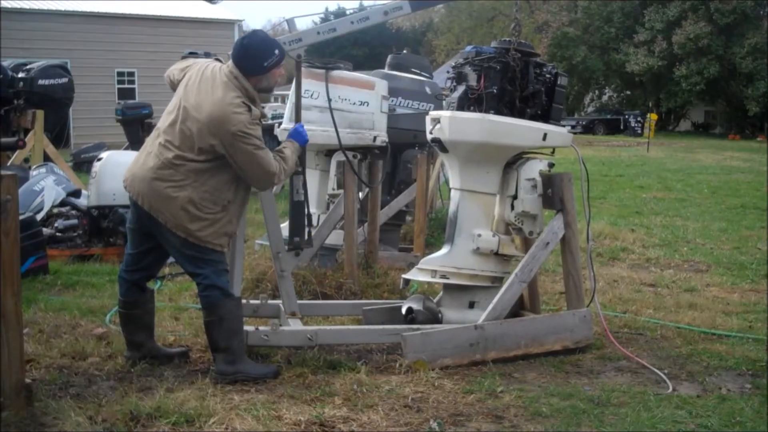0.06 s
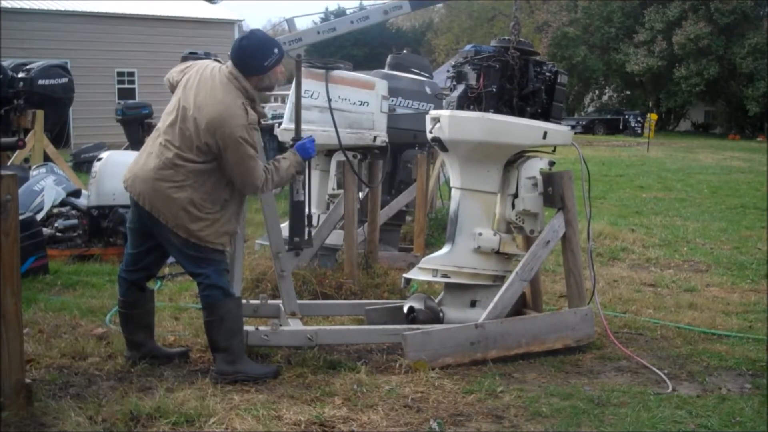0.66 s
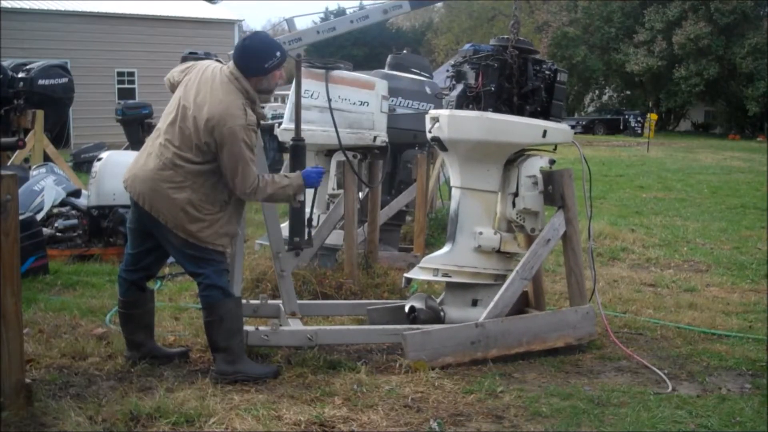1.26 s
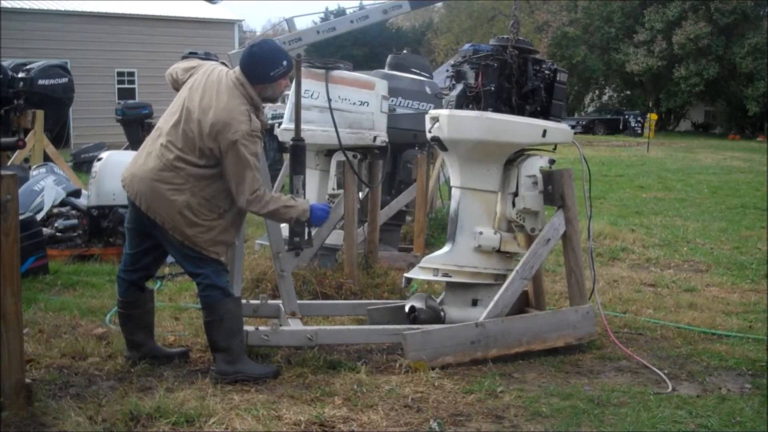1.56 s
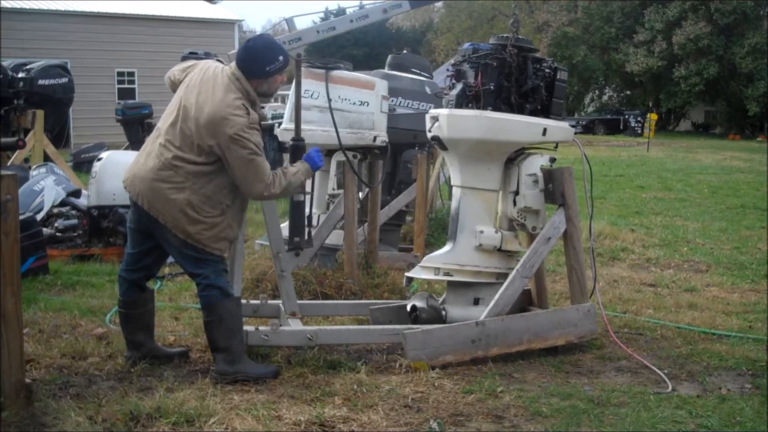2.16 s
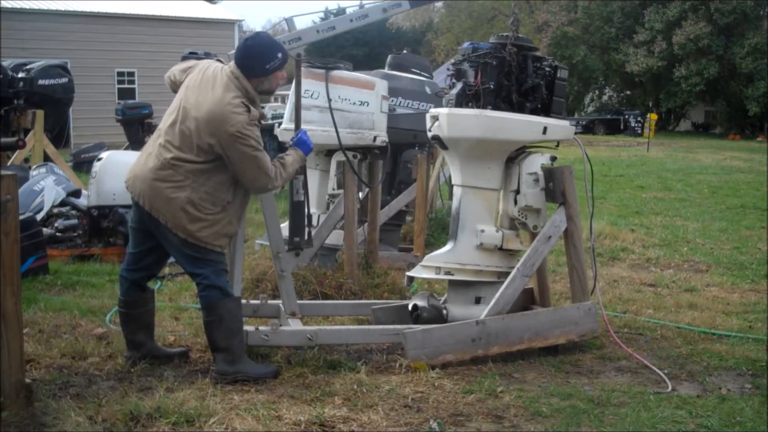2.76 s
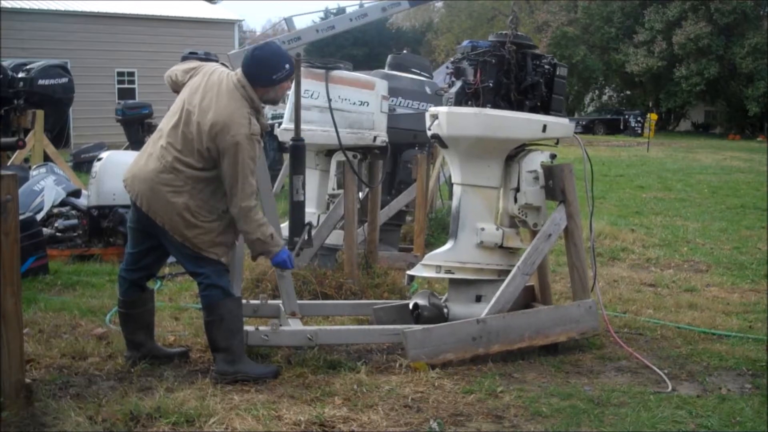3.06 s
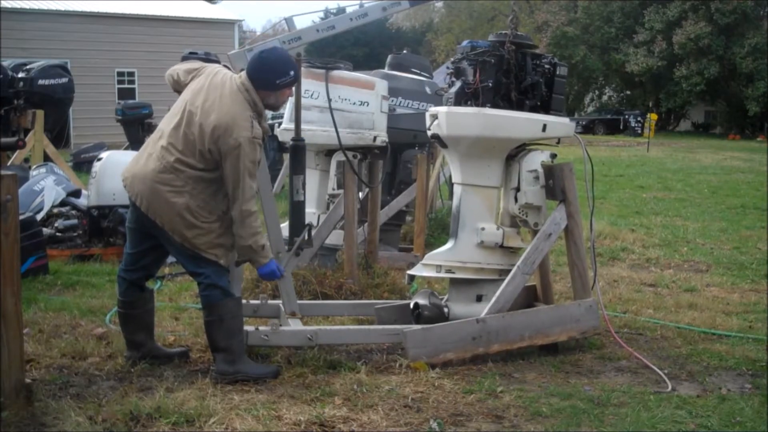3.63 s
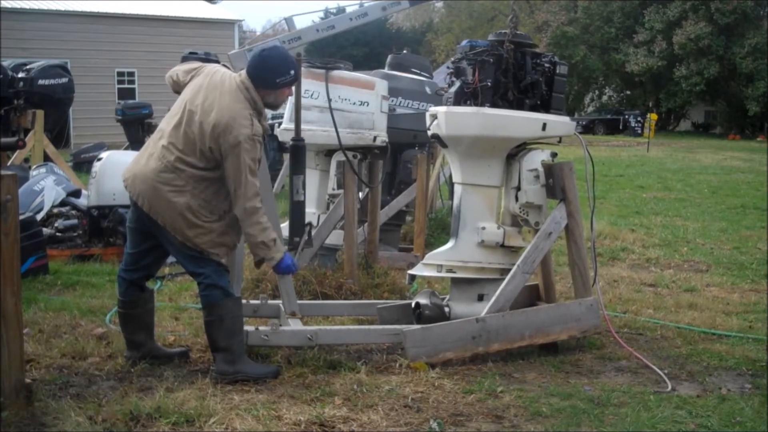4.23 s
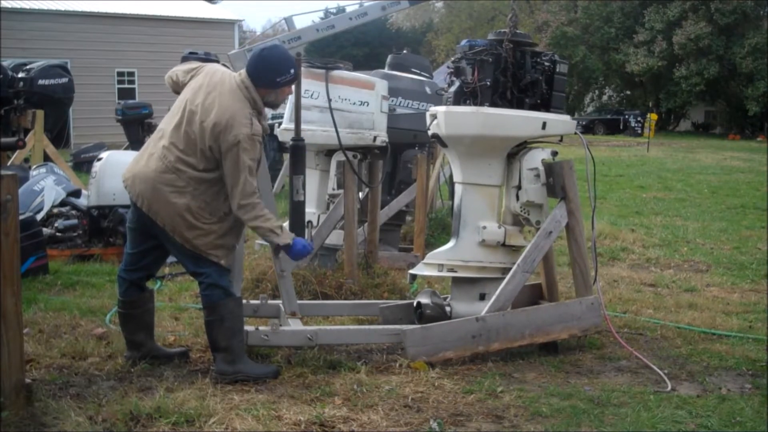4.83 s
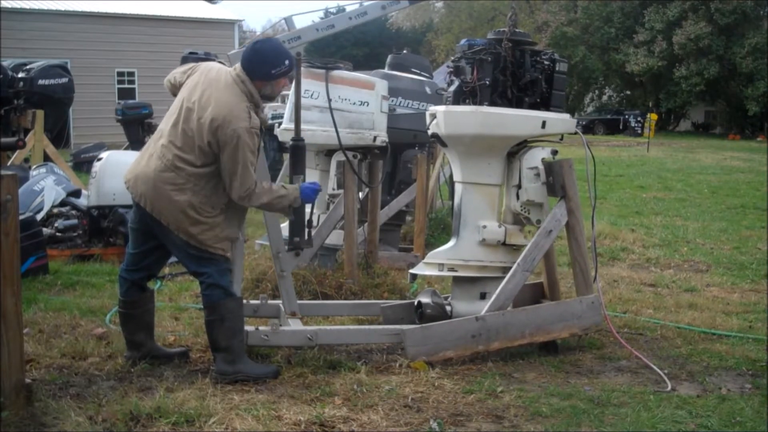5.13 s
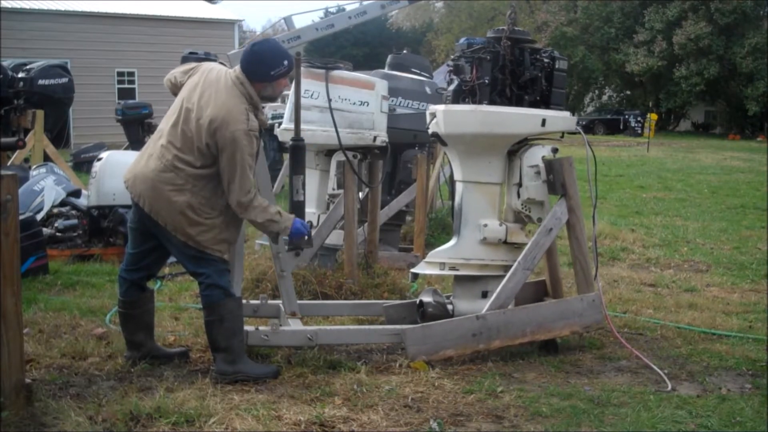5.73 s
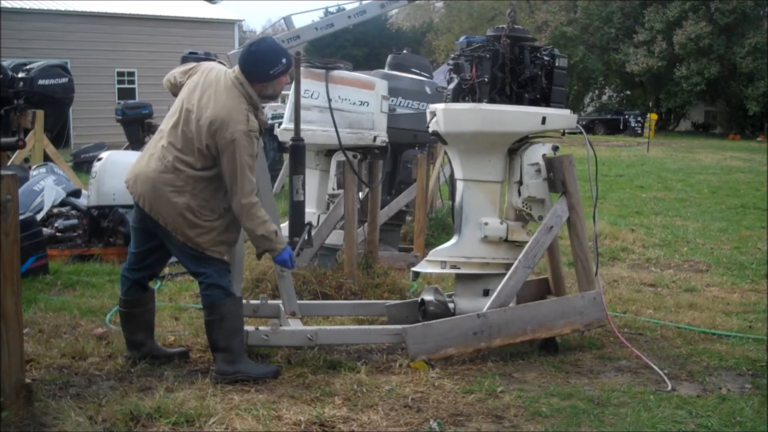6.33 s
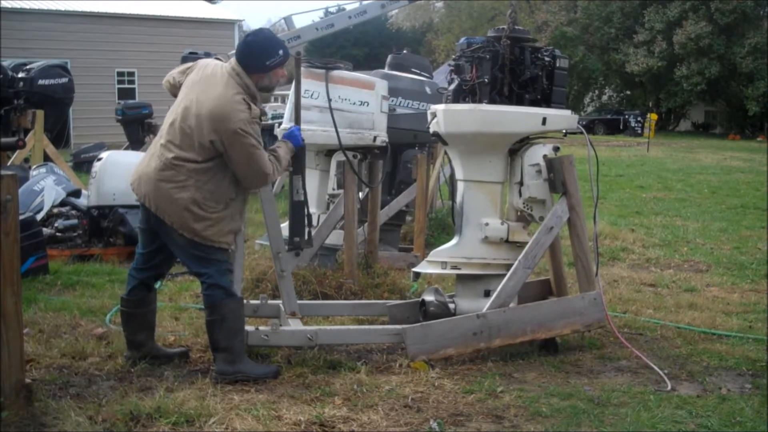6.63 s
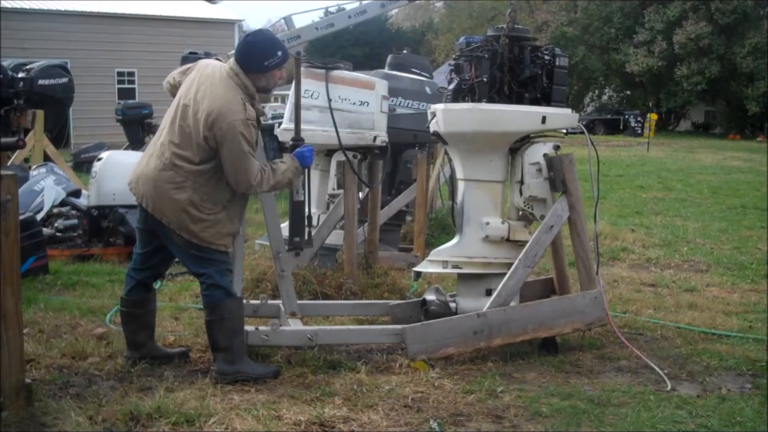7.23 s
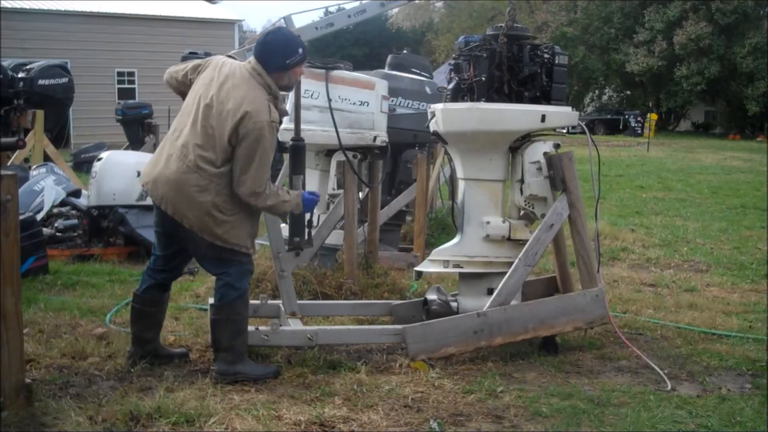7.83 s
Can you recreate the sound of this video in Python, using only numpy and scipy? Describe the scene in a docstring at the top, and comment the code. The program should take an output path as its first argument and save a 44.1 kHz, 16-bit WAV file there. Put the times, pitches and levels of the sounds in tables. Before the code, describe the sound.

A hand-pumped lever hoist clacks steadily outdoors, with lighter return knocks, chain ticks, tiny squeaks and ringing steel.

```python
"""A hook pings as its chain snaps taut; then a hand-pumped lever hoist clacks, lifting an outboard motor.
Each stroke: the pawl snaps over, the lever takes the load, the brake slips with a short squeak.
The lever knocks on its return; links tick, slack chain knocks and brushes, dry joints creak.
The blows ring the steel engine crane. Behind: an open yard, a thin echo, a faint distant hum."""
import sys
import numpy as np
from scipy import signal
from scipy.fft import rfft, irfft
from scipy.io import wavfile
from scipy.ndimage import uniform_filter1d

SR = 44100
rng = np.random.default_rng(int(sys.argv[2]) if len(sys.argv) > 2 else 0)


def materialize(psi):
    """Save the field psi as 16-bit PCM at rate SR to the path in sys.argv[1].

    A 1-D psi becomes a single channel; in a 2-D psi each row is a channel.
    """
    bounded = np.clip(np.atleast_2d(psi).T, -1, 1)
    quanta = np.round(bounded * 32767).astype(np.int16)
    wavfile.write(sys.argv[1], SR, quanta)


N = 356328
HZ = np.maximum(np.fft.rfftfreq(N, 1 / SR), 1)
TIME_S = np.arange(N) / SR
AGE_S = TIME_S[:SR // 2]  # time within one event

# Event levels are relative; each layer adds its own offset.
# power strokes: (clack time [s], clack [dB], frame [dB], pawl lead [s], pawl [dB],
#                 squeak [dB], squeak hold [s], squeak pitch [Hz])
POWER_STROKES = [(0.2507, -3, -23.5, .0324, -3, -17, 0.011, 7470),
                 (0.9336, -2, -22.5, .0286, -11.5, -24, 0.024, 7530),
                 (1.5912, -1.5, -22.5, 0.028, -9.5, -19, 0.016, 7590),
                 (2.2549, -0.5, -21, 0.038, -23, -36, .01, 7800),
                 (2.9056, -4, -21, 0.032, -4.5, -21.5, 0.015, 7700),
                 (3.5502, -1.5, -19.5, 0.026, -9.5, -44, .01, 7550),
                 (4.182, -2, -21.5, 0.028, -11.5, -15.5, 0.051, 7460),
                 (4.8165, -2.5, -22, 0.027, -9, -19.5, 0.043, 7470),
                 (5.4809, -4, -21.5, .024, -4, -15, 0.036, 7460),
                 (6.1465, -2.5, -22, 0.032, -8.5, -14, 0.015, 7430),
                 (6.8227, -3, -24, 0.03, -9, -17.5, 0.027, 7280),
                 (7.513, -4, -22.5, 0.03, -6, -14, .032, 7490)]
# lever hitting its return stop: (time [s], knock [dB], frame [dB], pawl lead [s], pawl [dB])
RETURN_SWINGS = [(.62, -11, -28.5, 0.034, -13.5), (1.275, -10, -27.5, .0236, -16),
                 (1.934, -9, -26.5, .053, -7), (2.58, -10.5, -27, 0.024, -16.5),
                 (3.241, -7.5, -29.5, 0.021, -16), (3.8821, -8, -26.5, .0196, -9),
                 (4.5131, -8.5, -30.5, 0.026, -20), (5.1642, -10, -28, 0.024, -12.5),
                 (5.8331, -12.5, -30.5, .0228, -8.5), (6.4813, -9.5, -34, 0.01, -9),
                 (7.175, -13.5, -29.5, 0.046, -34), (7.877, -7.5, -31.5, .0249, -19)]
# swinging chain hitting the crane, and a few dull link knocks: (time [s], snap [dB], frame [dB], snap t60 [s])
CHAIN_KNOCKS = [(0.1121, -12.5, -22, 0.2), (0.626, -29, -24, 0.14), (.7928, -23, -27.5, 0.14),
                (1.1348, -33, -38.5, .07), (1.306, -34, -28.5, .07), (1.4642, -34, -24.5, 0.24),
                (1.7128, -30, -30.5, .06), (2.125, -28, -31.5, .06), (2.7224, -20.5, -30.5, 0.21),
                (2.7869, -31, -31, 0.054), (3.4882, -42, -35, .06), (4.7115, -33, -34.5, 0.064),
                (5.3056, -32, -40.5, 0.064), (6.5065, -11.5, -27.5, .062), (6.708, -28, -31.5, 0.047),
                (6.8838, -4, -19, .14), (7.8994, -13.5, -26.5, 0.17)]
# links seating: (time [s], snap [dB])
LINK_TICKS = [(.39, -22), (0.4662, -17), (1.3692, -10), (1.4176, -21.5), (1.7906, -32), (1.911, -8),
              (2.0747, -30), (2.1473, -23), (2.4379, -20.5), (2.4912, -9.5), (3.1109, -19.5),
              (3.373, -23.5), (3.4313, -16.5), (3.674, -17), (3.7528, -12.5), (4.022, -16), (4.04, -13.5),
              (4.074, -28), (4.3874, -6), (4.649, -20.5), (4.9422, -23), (4.984, -27), (5.029, -6.5),
              (5.3812, -15.5), (5.677, -26), (5.6992, -5.5), (5.7901, -13), (5.9703, -26.5),
              (6.0342, -23.5), (6.2879, -26), (6.3697, -7), (6.6813, -25), (7.006, -25), (7.034, -8.5),
              (7.749, -9.5)]
# chain snapping taut at the hook: (time [s], ping [dB], frame [dB])
HOOK_PINGS = [(.089, -7, -25.5), (0.7514, -24.5, -37), (.763, -5, -28.5)]
# dry joints under load: (time [s], level [dB], length [s], start pitch [Hz], end pitch [Hz])
JOINT_CREAKS = [(2.437, -30, 0.047, 2780, 2720), (2.727, -37.5, 0.071, 662, 654),
                (3.823, -34, 0.045, 1900, 2000), (5.728, -40, 0.055, 3250, 3180),
                (5.758, -37, 0.033, 2930, 2500), (5.877, -34, 0.018, 980, 774),
                (5.878, -33, 0.028, 572, 503), (5.912, -40, 0.034, 650, 690),
                (7.833, -31, 0.058, 1840, 1900)]

# steel resonances: (frequency [Hz], width [Hz], peak over contact spectrum [dB])
LEVER_RESONANCES = [(2733, 21, 16.3), (4070, 29, 12), (6110, 115, 7.5), (6490, 67, 9.9), (7910, 144, 13.8),
                    (8600, 34, 3.6), (9710, 130, 13.5), (11510, 110, 12.7)]
PAWL_RESONANCES = [(1880, 180, 27), (2796, 39, 32.5), (3918, 69, 29.5), (5120, 106, 25.5), (6470, 23, 27.5),
                   (7974, 54, 31), (9430, 23, 17)]
LINK_RESONANCES = [(2100, 110, 6.1), (2730, 43, 14.3), (4030, 150, 11.5), (5380, 310, 8.2),
                   (6520, 930, 5.1), (8040, 310, 10.7), (9970, 340, 14)]
HOOK_RESONANCES = [(2500, 38, 3), (3560, 190, 7.6), (4430, 54, 4.9), (6120, 110, 18), (7320, 310, 12),
                   (9000, 170, 3)]
FRAME_RESONANCES = [(395.2, 5.5, 14.8), (676.6, 28, 6.8), (825, 74, 4.6), (979, 30, 11.24), (1363, 8.9, 9),
                    (1490, 11.4, 7.8), (1689, 24, 7.7), (1830, 13, 7.2), (2240, 15, 7.6), (2356, 38, 3.7),
                    (2506, 9.2, 8.5), (2692, 22, 1.25), (2776, 13, 8.7), (3390, 14, 7.6), (4170, 30, 9.5),
                    (4330, 11, 2.7), (4610, 28, 8.2), (5300, 7.1, 7.2), (6350, 30, 3.9), (6200, 34, 14.6)]
# spectral shapes of contacts and outdoor air: (frequency [Hz], relative level [dB])
SNAP_SPECTRUM = [(200, -40), (800, -34), (2000, -15), (4000, -5.5), (6500, 2), (8300, -4.5), (10500, -22.5),
                 (13500, -17.5), (15000, -58)]
TICK_SPECTRUM = [(200, -32), (800, -11.5), (2000, -4), (4000, -2.5), (6500, 7), (8300, -3), (10500, -22.5),
                 (13500, -21.5), (15000, -37)]
FRAME_SPECTRUM = [(100, -18.5), (300, -15.5), (530, -16), (720, -3), (1200, -3.5), (2200, 2.5),
                  (3400, -3.5), (5500, -7.5), (8000, -17.5), (10500, -36), (13500, -60), (15000, -18.5)]
AIR_SPECTRUM = [(15, -58), (25, -23.5), (98, -7.5), (263, -16.5), (393, -7), (542, -13.5), (977, -2),
                (1210, -5.5), (1710, -4), (3090, -17.5), (6190, -20), (8090, -22.5), (10600, -33.5),
                (13500, -34), (15000, -48)]
# distant machine: (frequency [Hz], level [dB])
HUM_TONES = [(98.5, -64), (143, -67.5), (205, -69.5)]
# stereo colour: (frequency [Hz], left minus right [dB], left phase lead [rad])
STEREO_COLOUR = [(100, -1, -0.11), (2370, -1.5, -0.27), (4200, -2.5, -0.69), (5740, -4, -1.03),
                 (6590, -14.5, 1.4), (6640, 3, 1.55), (7820, 12.5, 1.09), (9970, 5.5, -1.7),
                 (12000, 6.5, -1.4)]


def lever_clacks():
    """The loaded lever strikes hard; its push on the frame swells later. Returns (sound, push)."""
    times_s, db, frame_db = np.transpose(POWER_STROKES)[:3]
    snap = contacts(times_s, db - 8, t60_s=.093, rise_s=.00072, spread=.093, grain_db=-2.5)
    push = contacts(times_s, frame_db + 8.5, t60_s=.17, rise_s=.013, spread=.1, grain_db=-1)
    tones = ring(times_s, db - 11, LEVER_RESONANCES, scatter_db=15) + frame_ring(times_s, frame_db - 5)
    return filtered(snap, response(SNAP_SPECTRUM, LEVER_RESONANCES)) + tones, push


def pawl_snaps(power_push_db=-38.5, return_push_db=-33.5):
    """The light pawl snaps over and buzzes just before the lever lands. Returns (sound, push)."""
    lands_s, _, _, lead_s, db = np.transpose([row[:5] for row in POWER_STROKES + RETURN_SWINGS])
    times_s = lands_s - lead_s
    push_db = np.repeat([power_push_db, return_push_db], [len(POWER_STROKES), len(RETURN_SWINGS)])
    snap = contacts(times_s, db - 8.5, t60_s=.022, rise_s=.00023, spread=.3, grain_db=-3)
    buzz = contacts(times_s, db - 21.5, t60_s=.17, rise_s=.0044, spread=.21, grain_db=2)
    push = contacts(times_s, push_db, t60_s=.33, rise_s=.00077, spread=.05, grain_db=4)
    tones = ring(times_s, db - 12.5, PAWL_RESONANCES, scatter_db=6.5)
    return filtered(snap + buzz, response(SNAP_SPECTRUM, PAWL_RESONANCES)) + tones, push


def brake_squeaks(delay_s=.016, drop_hz=200, flutter_db=5.5, beat_hz=390, lower_db=-5.5):
    """The brake slips after each clack: a whistle sinks to pitch, beating with a shorter, lower one."""
    out, size = np.zeros(N), len(AGE_S)
    for clack_s, *_, db, hold_s, hz in POWER_STROKES:
        pitch_hz = hz + np.exp(-AGE_S / .012) * drop_hz * (1 + wander(600, size))
        phase = 2 * np.pi * np.cumsum(pitch_hz) / SR
        whistle = undb(flutter_db * wander(330, size)) * np.sin(phase)
        lower_gain = undb(lower_db + flutter_db * wander(210, size)) * decay(AGE_S, t60_s=.41)
        lower = lower_gain * np.sin(phase - 2 * np.pi * beat_hz * AGE_S)
        release = decay(np.maximum(AGE_S - hold_s, 0), t60_s=.19)
        envelope = np.minimum(AGE_S / .0024, 1) * np.exp(-AGE_S / .063) * release
        add(out, clack_s + delay_s, envelope * undb(db) * (whistle + lower))
    return out


def knocks(stop_t60_s=.084):
    """Duller blows: lever on its return stop, swinging chain on the crane, a few dull links. Returns (sound,
    push)."""
    stops = [(*row[:3], stop_t60_s) for row in RETURN_SWINGS]
    times_s, db, frame_db, t60_s = np.transpose(stops + CHAIN_KNOCKS)
    snap = contacts(times_s, db - 8.5, t60_s, rise_s=.0011, spread=.085, grain_db=1.5)
    push = contacts(times_s, frame_db + 4, t60_s=.18, rise_s=.0065, spread=.12, grain_db=1)
    tones = ring(times_s, db - 10.5, LEVER_RESONANCES, scatter_db=8) + frame_ring(times_s, frame_db - 5)
    return filtered(snap, response(TICK_SPECTRUM)) + tones, push


def link_ticks(pitch_count=6, low_hz=1800, high_hz=7500, width_hz=45):
    """Each link seats with a tick, a small rebound and its own pitches. Returns (sound, push)."""
    times_s, db = np.transpose(LINK_TICKS)
    push_db = -28.5 + .19 * db
    snap = contacts(times_s, db - 10.5, t60_s=.036, rise_s=.0011, spread=.23, grain_db=2)
    rebounds_s = times_s + .006 + .02 * rng.random(len(times_s))
    rebound = contacts(rebounds_s, db - 31.5, t60_s=.14, rise_s=.00074, spread=.36, grain_db=5.5)
    push = contacts(times_s, push_db, t60_s=.14, rise_s=.0014, spread=.074, grain_db=2.5)
    pitches_hz = rng.uniform(low_hz, high_hz, (len(times_s), pitch_count))
    tinks = np.zeros(N)
    for start_s, link_db, link_hz in zip(times_s, db, pitches_hz):
        tinks += ring([start_s], [link_db - 15], [(hz, width_hz, 0) for hz in link_hz], scatter_db=5)
    ticks = filtered(snap + rebound, response(TICK_SPECTRUM, LINK_RESONANCES))
    return ticks + tinks + frame_ring(times_s, push_db - 14), push


def hook_pings():
    """The hook rings as the loaded chain comes taut. Returns (sound, push)."""
    times_s, db, frame_db = np.transpose(HOOK_PINGS)
    snap = contacts(times_s, db - 4, t60_s=.047, rise_s=.00041, spread=.13, grain_db=-5.5)
    push = contacts(times_s, frame_db + 4, t60_s=.19, rise_s=.0086, spread=.084, grain_db=3.5)
    tones = ring(times_s, db, HOOK_RESONANCES, scatter_db=2.5)
    return filtered(snap, response(TICK_SPECTRUM, HOOK_RESONANCES)) + tones, push


def frame_ring(times_s, levels_db, delay_s=.005):
    """The crane's tubes ring on after a blow, weakly in the bass."""
    tones = ring(times_s + delay_s, levels_db, FRAME_RESONANCES, scatter_db=4.5)
    return filtered(tones, response(FRAME_SPECTRUM))


def chain_brushes(max_db=-31, range_db=12, per_stroke=12, window_s=.5):
    """Slack chain brushes the frame at random ahead of each clack. Returns the push only."""
    clacks_s = np.repeat(np.transpose(POWER_STROKES)[0], per_stroke)
    earliness, softness = rng.random((len(clacks_s), 2)).T
    times_s = clacks_s - np.minimum(window_s, clacks_s) * earliness
    db = max_db - range_db * softness
    return contacts(times_s, db, t60_s=.086, rise_s=.0039, spread=.56, grain_db=.5)


def joint_creaks(flutter_db=3):
    """Dry joints stick and slip in short, raspy glides."""
    out, size = np.zeros(N), len(AGE_S)
    for start_s, db, length_s, start_hz, end_hz in JOINT_CREAKS:
        progress = np.minimum(AGE_S / length_s, 1)
        glide_hz = start_hz + (end_hz - start_hz) * progress
        slip = 1 + .04 * wander(start_hz / 2, size)
        phase = 2 * np.pi * np.cumsum(glide_hz * slip) / SR
        envelope = np.sin(np.pi * np.sqrt(progress)) * undb(db + .5 + flutter_db * wander(310, size))
        add(out, start_s, envelope * np.sin(phase))
    return out


def yard_echo(sound, db=-12, t60_s=.52, rise_s=.0069):
    """House wall and trees scatter back a thin, dull tail."""
    tail = noise(N, spread=.44) * decay(TIME_S, t60_s) * (1 - np.exp(-TIME_S / rise_s))
    tail /= np.sqrt(np.sum(tail[0] ** 2))
    dulling = undb(log_curve([300, 1500, 3500, 7500, 12000], [0, -3.5, -5, -11.5, -25]))
    return undb(db) * filtered(sound.mean(axis=0), rfft(tail) * dulling)


def outdoor_air(db=-45.5):
    """Soft, nearly steady broadband noise."""
    return filtered(noise(N, spread=.23), response(AIR_SPECTRUM)) * undb(db + .19 * wander(12))


def distant_hum(waver_db=2, drift_hz=3):
    """A far machine: low tones wavering in level and pitch."""
    out = np.zeros(N)
    for hz, db in HUM_TONES:
        amplitude = np.sqrt(2) * undb(db + waver_db * wander(25))
        phase = 2 * np.pi * np.cumsum(hz + drift_hz * wander(13)) / SR
        out += amplitude * np.sin(phase)
    return out


def contacts(times_s, levels_db, t60_s, rise_s, spread, grain_db):
    """Steel on steel: each blow is a dying noise burst, grainy with tiny uneven rebounds."""
    out = np.zeros((2, N))
    for start_s, db, life_s in zip(times_s, levels_db, np.broadcast_to(t60_s, len(times_s))):
        envelope = (1 - np.exp(-AGE_S / rise_s)) * decay(AGE_S, life_s)
        add(out, start_s, undb(db) * envelope * noise(len(AGE_S), spread))
    return out * undb(grain_db * wander(600))


def ring(times_s, levels_db, modes, scatter_db):
    """Free ringing; each blow excites the modes in a different mix."""
    hz, width_hz, mode_db = np.transpose(modes)[:, :, None]
    weight = undb(mode_db) * np.sqrt(width_hz)
    attack = 1 - np.exp(-AGE_S / .00065)
    tones = weight / np.linalg.norm(weight) * np.exp((2j * hz - width_hz) * np.pi * AGE_S) * attack
    out = np.zeros(N)
    for start_s, db in zip(times_s, levels_db):
        gains = undb(db) * unit_rms(undb(scatter_db * rng.standard_normal(len(hz))))
        phasors = np.exp(2j * np.pi * rng.random(len(hz)))
        add(out, start_s, ((gains * phasors) @ tones).imag)
    return out


def response(spectrum, modes=()):
    """Causal unit-power response: resonance peaks on a broad spectrum."""
    peaks = 1 + sum(undb(db) ** 2 / (1 + (2 * (HZ - hz) / width_hz) ** 2) for hz, width_hz, db in modes)
    magnitude = undb(log_curve(*np.transpose(spectrum))) * np.sqrt(peaks)
    cepstrum = irfft(np.log(magnitude), N)
    return unit_rms(np.exp(rfft(2 * cepstrum[:N // 2], N)))


def noise(size, spread):
    """Stereo noise; spread is the side to mid ratio."""
    mid, side = rng.standard_normal((2, size))
    return unit_rms(np.array([mid + spread * side, mid - spread * side]))


def wander(rate_hz, size=N):
    """Smooth random drift, deviation near 1."""
    step = max(int(SR / rate_hz), 1)
    return uniform_filter1d(np.repeat(rng.standard_normal(size // step + 1), step), step)[:size]


def undb(db):
    return 10 ** (np.asarray(db) / 20)


def unit_rms(x):
    return x / np.sqrt(np.mean(np.abs(x) ** 2))


def decay(age_s, t60_s):
    return np.exp(-np.log(1000) * age_s / t60_s)


def log_curve(hz, values):
    return np.interp(np.log(HZ), np.log(hz), values)


def filtered(x, gain):
    return irfft(rfft(x, N) * gain, N)


def add(out, start_s, x):
    start = max(int(start_s * SR), 0)
    out[..., start:start + x.shape[-1]] += x[..., :N - start]


def scene(low_cut_hz=110):
    """Struck parts sound directly and push on one steel frame; the yard lies behind."""
    sounds, pushes = zip(pawl_snaps(), lever_clacks(), knocks(), link_ticks(), hook_pings())
    frame = filtered(sum(pushes) + chain_brushes(), response(FRAME_SPECTRUM, FRAME_RESONANCES))
    hoist = sum(sounds) + frame + brake_squeaks() + joint_creaks()
    # the hoist carries almost no bass
    hoist = signal.sosfilt(signal.butter(2, low_cut_hz, "high", fs=SR, output="sos"), hoist)
    return hoist + yard_echo(hoist) + outdoor_air() + distant_hum()


def record(dry, top_hz=14200):
    """Left and right colour the treble differently; peaks clip at full scale; the top is cut."""
    hz, balance_db, lead_rad = np.transpose(STEREO_COLOUR)
    left_gain = undb(log_curve(hz, balance_db) / 2) * np.exp(.5j * log_curve(hz, lead_rad))
    coloured = filtered(dry, np.array([left_gain, 1 / left_gain]))
    lowpass = signal.ellip(8, .2, 70, top_hz, fs=SR, output="sos")
    return signal.sosfilt(lowpass, np.clip(coloured, -1, 1))


dry = scene()
out = record(dry)
materialize(out)
```